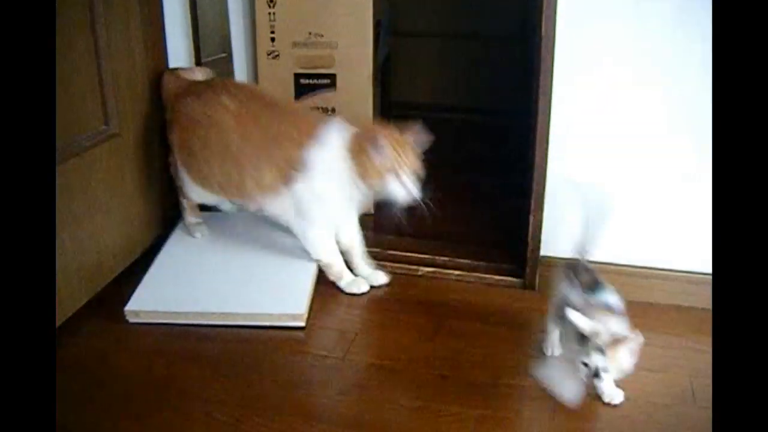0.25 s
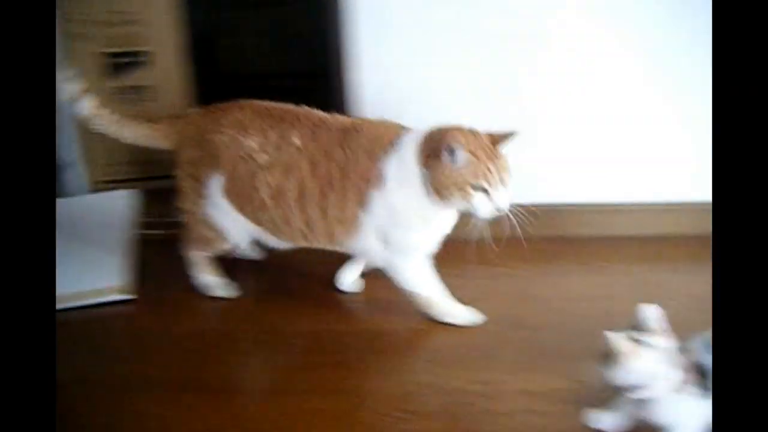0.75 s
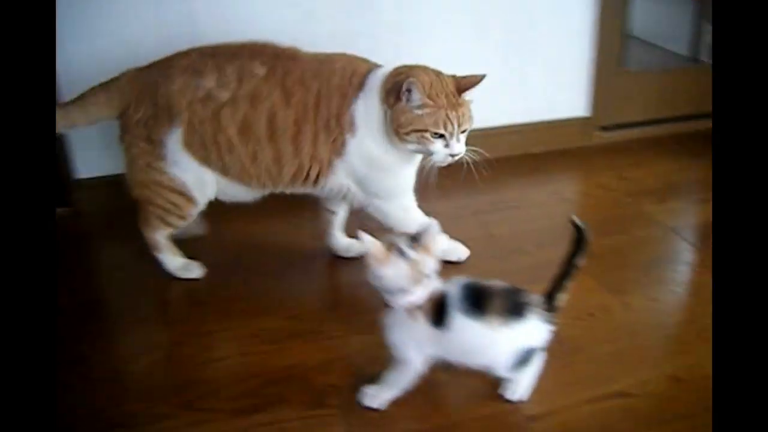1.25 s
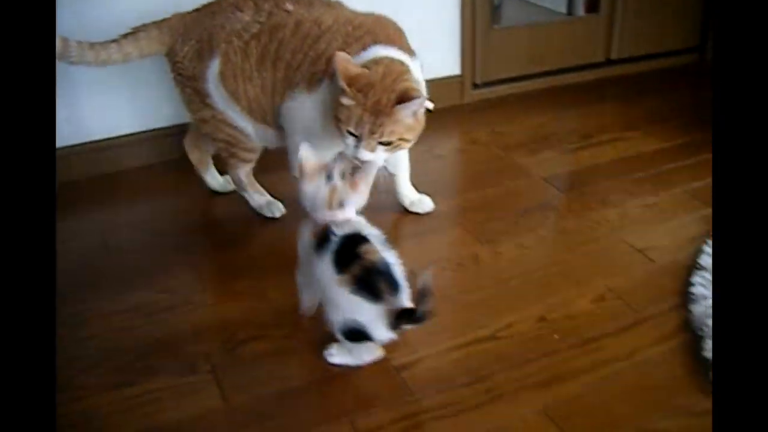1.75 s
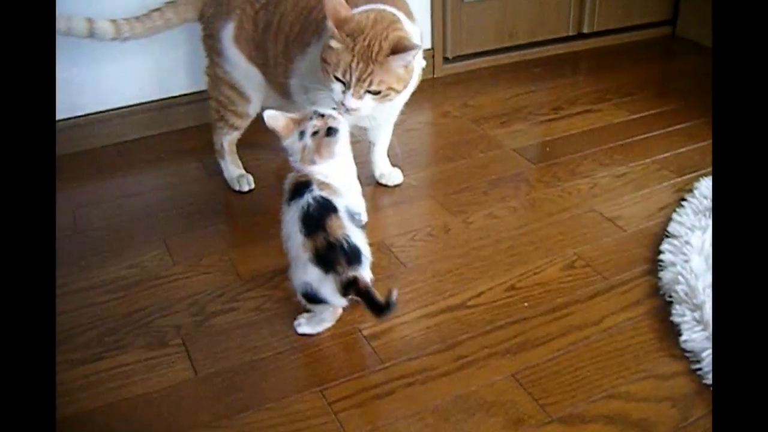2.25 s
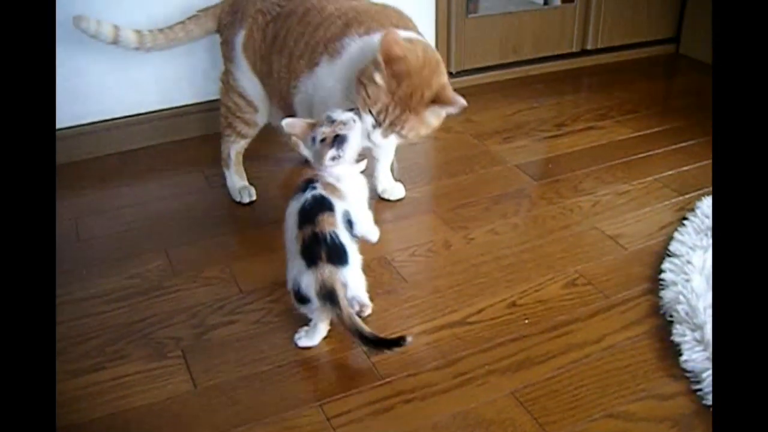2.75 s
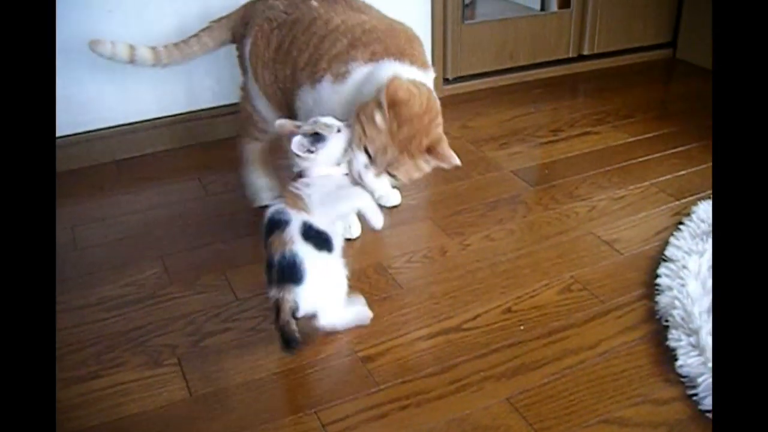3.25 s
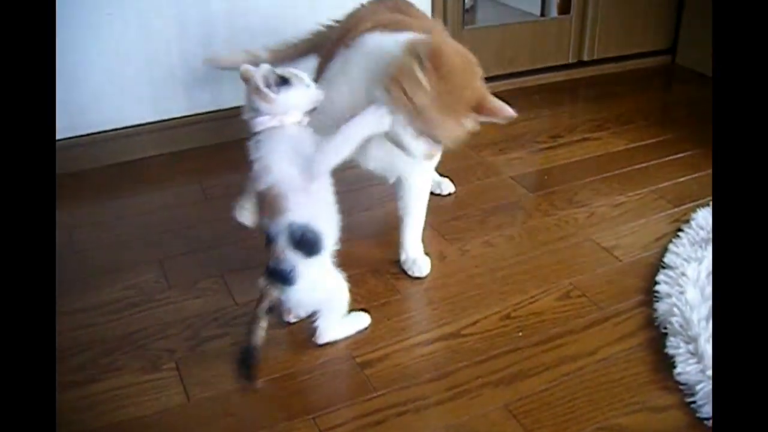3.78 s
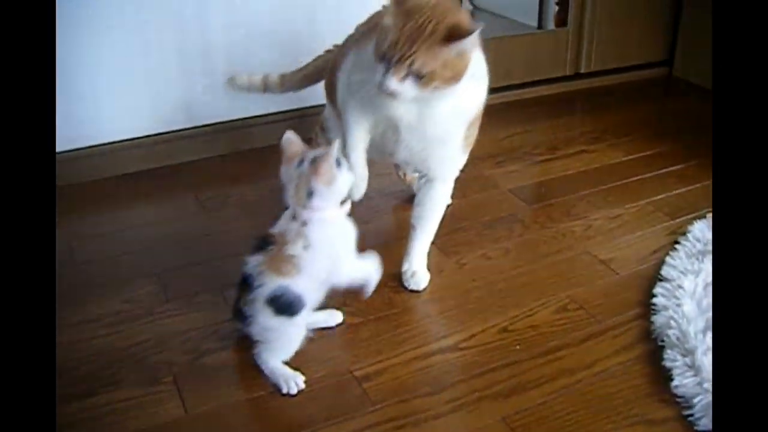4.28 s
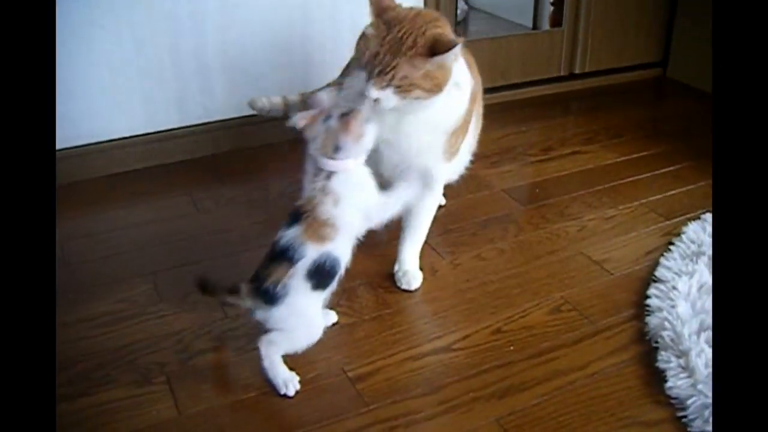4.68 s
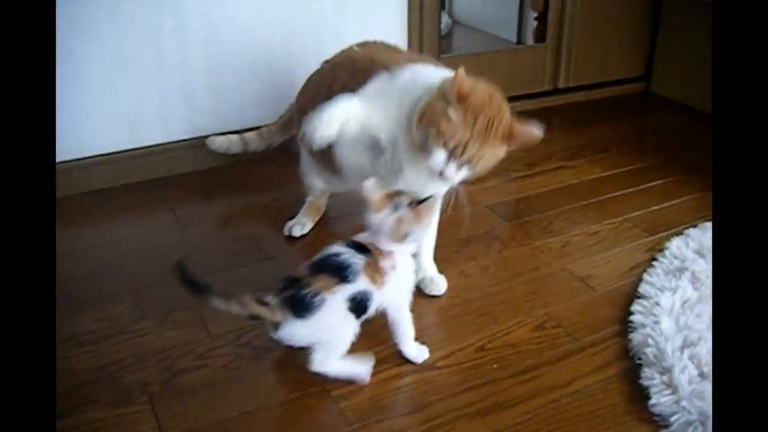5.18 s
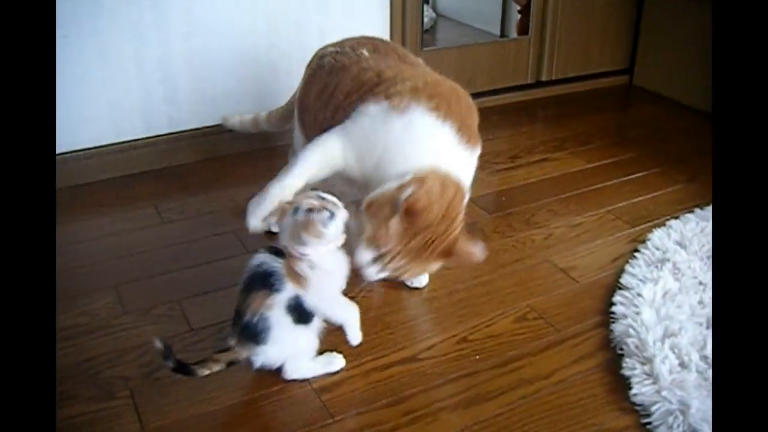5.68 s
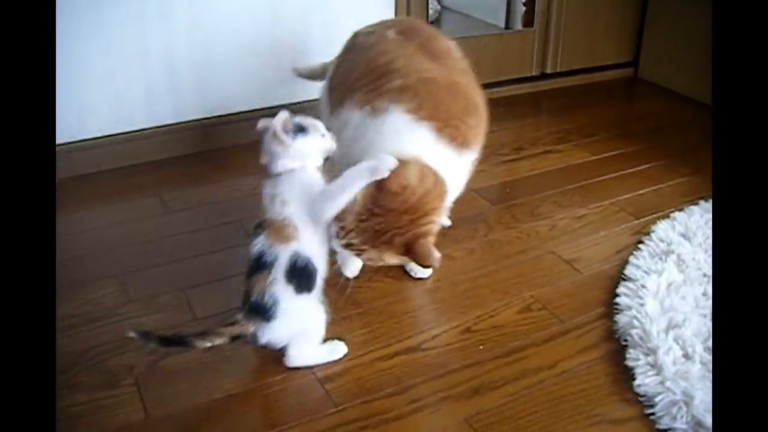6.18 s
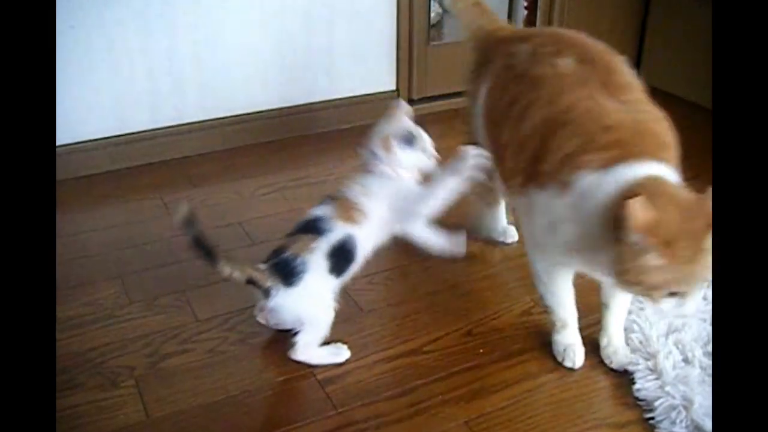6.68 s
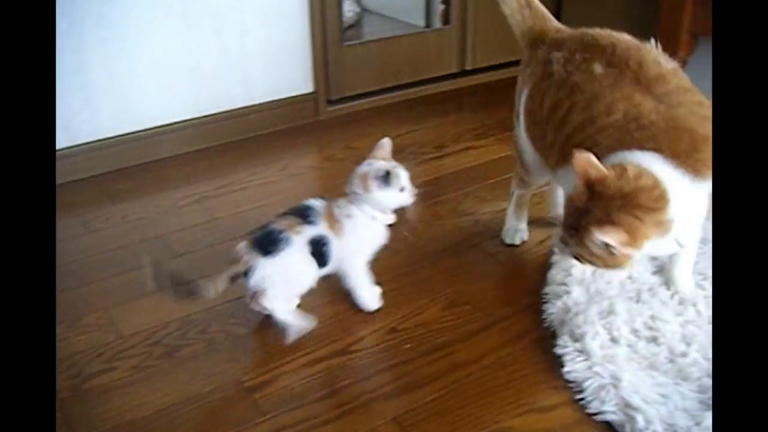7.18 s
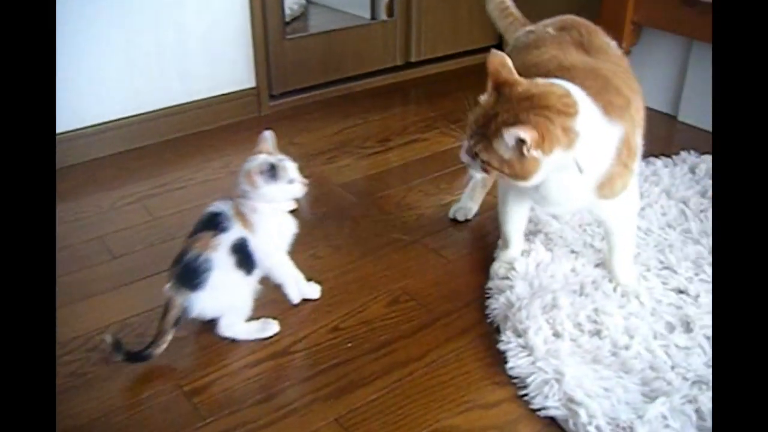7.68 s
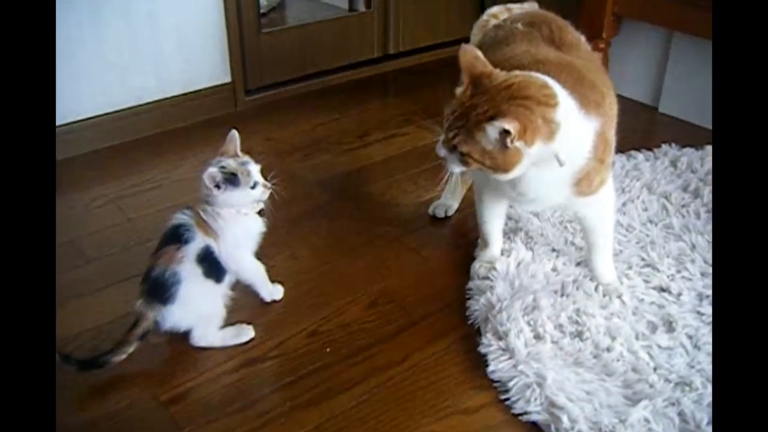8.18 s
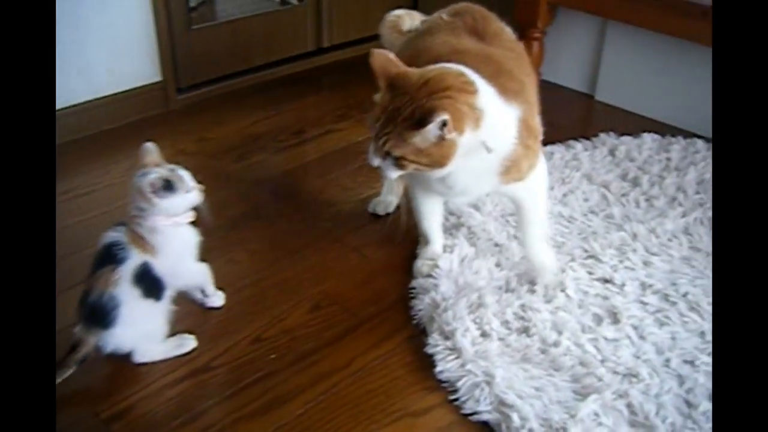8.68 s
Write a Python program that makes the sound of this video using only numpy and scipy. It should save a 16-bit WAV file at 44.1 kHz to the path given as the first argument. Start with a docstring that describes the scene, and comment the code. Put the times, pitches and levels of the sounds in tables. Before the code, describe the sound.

A small quiet room with a hollow wooden floor, steady soft hiss and an almost inaudible, very high whine. From 0 to 0.4 s, light paw thuds, claw ticks and faint bell tinkles, with a swelling scrape. At 0.44 s a loose board bangs very loudly, overloading the microphone, with a short woody boom; it rocks in weakening knocks and low thuds until about 0.75 s. Small claw clicks and bell jingles continue, sharper near 1.0 s, thinning by 1.8 s. Near quiet until 2.9 s, when there is one small tick. From 3.3 s soft thumps and jingles return, with a strong hard knock at 4.03 s. Sparse taps follow from 4.6 to 5.6 s. At 6.4-7.2 s comes a flurry of padded thumps, ticks and a brighter jingle at 6.6 s. After a pause, firm wooden knocks, claw clicks and brief skids cluster from 8.1 to 8.9 s.

```python
"""A small quiet room with a hollow wooden floor, where a kitten and a grown cat scuffle.
Paws, and the floor rocking, thud as excited floor modes; claws tick as noise cracks with woody knocks;
fur, pads and the rocking board scrape as noise, a collar bell jingles as struck resonances, a loose board bangs.
A thin steady high whine, as of a television, is in the room; a small microphone adds hiss and a treble dip,
clips the peaks and cuts the top steeply, which weakens the whine."""
import sys
import numpy as np
from scipy import signal
from scipy.fft import rfft, irfft
from scipy.io import wavfile
from scipy.ndimage import uniform_filter1d

SR = 44100
rng = np.random.default_rng(int(sys.argv[2]) if len(sys.argv) > 2 else 0)


def master_out(mix):
    """Clip the mix to full scale and print it as 16-bit PCM to the path in sys.argv[1]."""
    frames = np.transpose(np.atleast_2d(mix))
    ceiling = np.clip(frames, -1, 1)
    pcm = np.round(ceiling * 32767).astype(np.int16)
    wavfile.write(sys.argv[1], SR, pcm)


N = 394254   # samples

# Landings and the rocking floor
CONTACT_S = 0.003037   # the boards are loaded this long after the touch
LANDING_RISE_S = 0.0024   # time constant
PAD_SOFT_HZ, PAD_FIRM_HZ = 133, 560   # the pad pushes higher modes the firmer it lands
PAD_NARROW_DB = 20   # dB per octave squared, before hard landings spread it
WEIGHT_HZ, WEIGHT_NARROW_DB = 88, 21.5   # the weight pushes the lowest modes; dB per octave squared
HARD_LANDING_DB, SPREAD_PER_DB = -24, 0.2   # above this peak: share of narrowness lost per dB

# Claws, bell and skids
TICK_TREBLE_HZ, TICK_ECHO_T60_S = 9900, 0.28
KNOCK_DB = -26   # re the tick's level
RATTLE_S = 0.076   # the pellet's later hits fall within this time
SWELL_DB = 32   # a skid swells in from this far below its level

# Loose board, hiss, whine in the room, microphone cut
BOOM_DB, BOOM_T60_S = 2, 0.21   # level re the contact's level
HISS_DB = -49
WHINE_HZ, WHINE_DB = 16020, -76   # before the microphone's cut
CUTOFF_HZ = 15850


def from_db(db):
    """Level to amplitude: 20 dB is a factor of ten."""
    return 10 ** (np.asarray(db) / 20)


def rms_one(x):
    """Power normalization: scales a signal to rms 1."""
    return x / np.sqrt(np.mean(x ** 2) + 1e-20)


def coloured(size, level_db):
    """Spectral shaping: white noise weighted by a level function of frequency, at rms 1."""
    hz = np.maximum(np.fft.rfftfreq(size, 1 / SR), 10)
    spectrum = rfft(rng.standard_normal(size)) * from_db(level_db(hz))
    return rms_one(irfft(spectrum, size))


def on_log_axis(points):
    """Log-frequency interpolation: a spectrum table becomes a function of Hz."""
    hz, level = np.transpose(points)
    return lambda f: np.interp(np.log(f), np.log(hz), level)


def hump(centre_hz, db_per_octave2):
    """Broad resonance: level falls with the square of the distance in octaves."""
    return lambda f: -db_per_octave2 * np.log2(f / centre_hz) ** 2


def dying(t, t60, rise):
    """Exponential decay: a blow's envelope rises quickly, then loses 60 dB in t60."""
    onset = 1 - np.exp(-t / max(rise, 1e-4))
    return onset * from_db(-60 * t / max(t60, .005))


def wobble(shape, depth_db, size):
    """Random amplitude modulation: an uneven gain, smoothed over a number of samples."""
    smooth = uniform_filter1d(rng.standard_normal(shape), size=size)
    return from_db(depth_db * rms_one(smooth))


def ring(clicks, hz, t60):
    """Damped resonance: a unit click sets a sine of height 1 ringing."""
    r, w = from_db(-60 / (t60 * SR)), 2 * np.pi * hz / SR
    return signal.lfilter([0, np.sin(w)], [1, -2 * r * np.cos(w), r * r], clicks)


def add(out, s, sound):
    """Superposition: mixes a sound in at a time."""
    at = round(s * SR)
    out[at:at + len(sound)] += sound[:N - at]


def room_hiss():
    """Stationary noise: room tone and microphone hiss share one fixed spectrum."""
    # room tone and microphone hiss: f/Hz, relative level per Hz/dB
    hiss_spectrum = [(20, -15), (55, -3), (100, -6), (300, -12), (1000, -16.5), (3000, -23), (6000, -24.5),
                     (9000, -24.5), (12000, -29), (16000, -30.5)]
    return from_db(HISS_DB) * coloured(N, on_log_axis(hiss_spectrum))


def whine():
    """Pure tone: a steady sine in the room, as of a television; its rms is its height over the root of two."""
    t = np.arange(N) / SR
    return from_db(WHINE_DB) * np.sqrt(2) * np.sin(2 * np.pi * WHINE_HZ * t)


def thuds():
    """Modal excitation: weight pushes low floor modes, the pad higher ones; a dull boom and a slap die with them."""
    # paws and bodies landing, and the floor rocking after the bang: touch t/s, body peak level/dB,
    # firmness (0-1), weight level re pad/dB, slap level re 5 dB below body peak/dB, decay time scale/s
    landings = [(0.022, -34, 0.55, -26, -5.5, 0.25), (.099, -32, 0.89, -17, -12, 1),
                (.139, -23, 0.46, 10, -43, 0.29), (.197, -32, 0.1, -11, -15, 0.13),
                (.304, -28, 0.3, 5, -9.5, 0.75), (.32, -26, 0.87, -2.5, -13, 0.96),
                (.369, -33, .9, -13, -14, .4), (.499, -15, 1, -10, -5.5, 0.55),
                (.549, -14.5, 0.43, -7, -1.5, 0.63), (.599, -17, 0.53, -8, -8, 0.44),
                (.745, -17.5, 0.4, -5.5, -8.5, 0.24), (1.084, -29, 0.48, -2, -11, 0.41),
                (1.342, -42.5, .55, 1, -8, 0.36), (1.472, -28.5, 0.11, -8, -34, .25),
                (1.594, -28, 0.46, -5.5, -34, 0.21), (1.733, -37, .45, -22, -32, 0.32),
                (3.346, -30.5, .85, -5, -10, 0.19), (3.397, -36, 0.18, -7, -15, 0.51),
                (3.591, -30, 0.22, 2.5, -21, .43), (3.796, -27.5, 0.31, -4.5, -20, 0.31),
                (4.029, -21, .0, -38, -20, 0.35), (4.028, -21, 0.68, -40, -4, 0.34),
                (4.636, -41, 0.04, -9, -2.5, .16), (4.726, -39.5, 0.3, -10, -14, .15),
                (4.949, -29, 0.55, -9.5, -2.5, 0.31), (5.2, -40.5, 0.28, 7, -10, 0.37),
                (5.361, -31, 0.51, -2, -24, 0.39), (6.359, -41, 0.05, -12, -18, 0.68),
                (6.424, -23.5, 0.3, -8, -16, 0.37), (6.426, -29.5, 1, -21, -7, 0.32),
                (6.52, -25, 0.37, -6, -18, 0.29), (6.627, -25.5, .4, -2.5, -23, 0.3),
                (6.641, -22, 0.52, -12, -19, 0.34), (6.861, -27, 0.51, -10, -15.5, 0.45),
                (6.918, -27.5, 0.62, -14, -12, 0.29), (6.969, -29.5, 0.8, 6, -18, 0.13),
                (7.108, -40.5, 0.64, -5, -5, 0.54), (7.189, -26, 0.49, -9.5, -21, .37),
                (8.113, -17.5, 0.78, -41, -21, 0.31), (8.195, -17.5, .9, -40, -9.5, 0.33),
                (8.347, -34.5, 0.8, 0, -10, 0.37), (8.392, -15, 0.86, -40, -23, 0.31),
                (8.469, -28.5, 0.4, -26, -13, 0.96), (8.518, -19.5, 0.74, -40, -22, 0.43),
                (8.592, -22.5, 0.28, -6, -12, 0.28), (8.624, -25.5, 0.29, -9, -12, 0.51),
                (8.659, -27.5, 0.86, -30, -4.5, 0.37), (8.777, -32.5, 0.81, -23, -8.5, 0.32),
                (8.849, -34.5, 0.8, -13, -12, 0.87), (8.907, -29.5, 0.31, -17, -16, 0.72)]
    # modes of the floor boards: f/Hz, level/dB, share of the landing's decay time scale
    floor_modes = [(33.7, 2.5, 1.9), (58.34, -1.5, 3.7), (84.7, 4, 0.77), (110.3, 2, 0.41), (133, -9, 2.5),
                   (172, 5, 0.6), (188.7, -1.5, 1.1), (230, -5, 0.54), (278.5, 1.5, 0.61),
                   (297.6, -2.5, 1.25), (334.7, 0, 0.7), (356.7, -7.5, 0.56), (405.8, -4.5, 0.45),
                   (487.6, -2.5, 0.45), (566.3, -6.5, 0.63), (674, -11.5, 0.55), (885, -17.5, 1.1)]
    out, t = np.zeros(N), np.arange(24000) / SR
    hz, mode_db, share = np.transpose(floor_modes)[:, :, None]
    weight_hump = hump(WEIGHT_HZ, WEIGHT_NARROW_DB)
    for s, peak_db, firm, weight_db, slap_db, t60 in landings:
        chance = rng.standard_normal((2, len(hz), 1))
        kept = np.clip(1 - SPREAD_PER_DB * (peak_db - HARD_LANDING_DB), .2, 1)
        pad = hump(PAD_SOFT_HZ * (PAD_FIRM_HZ / PAD_SOFT_HZ) ** firm, PAD_NARROW_DB * kept)

        def push(f):
            """Sum of forces: pad and weight add in amplitude."""
            return 20 * np.log10(from_db(pad(f)) + from_db(weight_db + weight_hump(f)) + 1e-9)

        strength = from_db(mode_db + push(hz) + 2 * chance[0])
        tones = np.sin(2 * np.pi * hz * t + .5 * chance[1])
        modes = strength * tones * from_db(-60 * t / (share * t60))
        body = modes.sum(axis=0) * dying(t, 2.6, LANDING_RISE_S)
        body = signal.lfilter(*signal.butter(2, 28, "high", fs=SR), body)   # the boards radiate no steady push
        body = body / np.abs(body).max()

        dull_hump = hump(250, db_per_octave2=3.0)
        dull = coloured(len(t), lambda f: push(f) + dull_hump(f))
        boom = from_db(-17.5) * dull * dying(t, 1.84 * t60, LANDING_RISE_S + 0.0014)
        slap_noise = coloured(len(t), hump(790, db_per_octave2=10.0))
        slap = from_db(slap_db - 5) * slap_noise * dying(t, 0.86 * t60, 0.00025)
        add(out, s + CONTACT_S, from_db(peak_db) * (body + boom + slap))
    return out


def ticks():
    """Impact and reverberation: a crack of a few ms, a woody knock, then the gritty echo in the room."""
    # claws and hard pads on the varnish: t/s, overall level/dB, centre f/Hz,
    # narrowness/(dB per octave squared; sign ignored), treble level re the middle band/dB, echo level re overall/dB
    claws = [(.1052, -32.5, 4370, 2.5, -8, -14.5), (.1797, -36, 2040, 0, -13, -15),
             (0.23, -48, 2560, 14, 13.5, -9.5), (0.276, -39, 2550, -10, 1, -30),
             (.3025, -33, 2230, 10, -6, -5.5), (.4366, 0, 3180, 5, -32, -26),
             (.7425, -29, 2260, 25, -29, -20), (.7748, -38.5, 2770, 1, 3, -24),
             (0.8236, -36, 2620, 11, -16, -16), (0.8534, -38.5, 2270, 2, 4, -18),
             (0.882, -29.5, 2304, 4, -12, -19), (0.8992, -32, 2770, 8, -3, -25),
             (.93, -47.5, 2250, 8, 18.5, -22), (1.0097, -21.5, 3800, 10.5, -22, -22),
             (1.0223, -17, 3770, 15, -15, -25.5), (1.096, -27.5, 2650, 10, -33, -21),
             (1.2737, -33.5, 2400, 5, -20, -31), (1.299, -29, 3220, 47, -27, -16.5),
             (1.4394, -56.5, 3200, 8, 21, -12), (1.5376, -24, 3970, 17, -12, -24),
             (1.7439, -36, 3110, 31, -20, -26), (1.769, -40, 3400, 12, 5, -35),
             (2.9322, -34, 4270, 16.5, -4, -15), (3.347, -34.5, 2090, 4, -14.5, -21),
             (3.686, -19.5, 2500, 6, -30, -19), (3.9204, -33, 2270, 1, 0, -16.5),
             (3.9374, -42.5, 2160, 2, 17.5, -19.5), (4.0312, -8.5, 2400, 20.5, -22, -17.5),
             (4.16, -43.5, 2920, 19, 3, -10.5), (4.6356, -31, 2650, 2.5, -13, -18.5),
             (4.9503, -25.5, 2200, 30, -32, -26), (5.1507, -31, 2400, 40, -26, -24),
             (5.2386, -53, 2880, 5, 13, -12.5), (5.555, -41.5, 2460, 11, -16, -11.5),
             (6.443, -24, 3220, 9, -28, -14.5), (6.4998, -40, 3090, 8, -14, -19),
             (6.6288, -31, 2520, 1.5, -10, -12.5), (6.6619, -28.5, 2700, 1, -15, -16),
             (6.691, -41, 2020, 13, 4, -10), (6.7361, -31, 2220, 5, -17, -14.5),
             (6.754, -29, 3070, 0, -24, -39), (6.8, -44.5, 3800, 0, -8, 1.5),
             (6.9207, -34.5, 2900, 2, -2, -13), (6.979, -44.5, 2190, 9, 17.5, -17.5),
             (6.998, -32.5, 3420, 2, -4, -22), (7.1096, -30, 2570, 1.5, -13, -14.5),
             (8.1173, -21.5, 2140, 18.5, -18, -31), (8.1223, -23.5, 2340, 4, -17, -15),
             (8.1984, -18.5, 2130, 17, -10, -31), (8.2015, -21.5, 2520, 1, -15, -17),
             (8.3985, -20, 2500, 10, -16, -18), (8.4724, -31.5, 2900, 3.5, -23, -10.5),
             (8.5277, -24.5, 2670, 20, -17, -16.5), (8.558, -33, 2740, 2, -20, -9),
             (8.6661, -28.5, 2720, 17, -18, -14.5), (8.7793, -41.5, 2800, 1.5, -14, -3.5),
             (8.9122, -30.5, 2660, 16, -9, -15)]
    # modes of the varnished boards knocked hard: f/Hz, level/dB, t60/s
    knock_modes = [(682, -6, 0.2), (1095, -9, 0.197), (1357, -6.5, 0.12), (1714, -17.5, .25),
                   (2100, -18.5, 0.15), (2400, -10, 0.27), (2520, -3, 0.098), (2650, -18, 0.6),
                   (2620, -18, 0.358), (2817, -15.5, 0.52), (3006, -14.5, .28), (3180, -23.5, 0.28),
                   (3500, -24, .25), (3950, -21, 0.4)]
    out, t = np.zeros(N), np.arange(16000) / SR
    hz, mode_db, t60s = np.transpose(knock_modes)[:, :, None]
    modes = from_db(mode_db - 60 * t / t60s) * np.sin(2 * np.pi * hz * t)

    def peaks(f):
        """Resonance curves: each mode raises the level of the noise around it."""
        curves = 3.5 * from_db(mode_db) / (1 + ((f - hz) / 45.0) ** 2)
        return 10 * np.log10(1 + curves.sum(axis=0))

    crack = from_db(-4.5) * dying(t, .012, 0.00038)
    for s, level_db, centre_hz, narrow, treble_db, echo_db in claws:
        tail = from_db(echo_db) * wobble(len(t), depth_db=2.0, size=130)
        broad = hump(centre_hz, abs(narrow))
        woody = coloured(len(t), lambda f: broad(f) + peaks(f))   # the echo keeps the colour of the boards
        mid = coloured(len(t), broad) * crack + woody * tail * dying(t, TICK_ECHO_T60_S, 0.011)

        top_envelope = crack + tail * dying(t, 1.1 * TICK_ECHO_T60_S, .004)
        top = coloured(len(t), hump(TICK_TREBLE_HZ, db_per_octave2=37.0)) * top_envelope
        beating = wobble(modes.shape, depth_db=3.5, size=500)   # close neighbours of each mode beat against it
        knock = from_db(KNOCK_DB) * rng.choice([-1, 1], len(hz)) @ (modes * beating)
        add(out, s, from_db(level_db) * (mid + knock + from_db(treble_db) * top))
    return out


def bell():
    """Repeated impact: each shake throws the pellet at the shell, and it rolls on in weaker, uneven hits."""
    # shakes of the collar bell: t/s, relative level/dB
    shakes = [(0.145, -36.5), (.236, -37.5), (.35, -41), (0.633, -36.5), (0.7997, -42), (.9705, -32),
              (1.166, -35), (3.412, -50), (3.489, -39), (3.54, -42), (3.644, -34), (3.7334, -43),
              (3.795, -31), (3.825, -32), (3.925, -24), (3.9794, -42), (4.0682, -43), (4.956, -41),
              (4.9843, -41.5), (5.057, -37.5), (5.159, -43.5), (5.306, -49), (5.495, -48), (6.415, -43),
              (6.481, -36), (6.531, -34.5), (6.618, -21), (6.6902, -27.5), (6.753, -32), (6.836, -32),
              (7.119, -46), (7.1493, -37), (7.1994, -44)]
    # modes of the collar bell: f/Hz, relative level/dB, t60/s
    bell_modes = [(8730, -3, .06), (8800, 0, .08), (9254, -18, .04), (7975, -9, .16)]
    out, count, touch_t60 = np.zeros(N), 12, .008
    s, shake_db = np.transpose(shakes)[:, :, None]
    late = np.sort(rng.random((len(s), count)), axis=1) * (np.arange(count) > 0)   # the first hit is at once
    at = np.minimum(((s + late * RATTLE_S) * SR).astype(int), N - 1)
    for hz, mode_db, t60 in bell_modes:
        clicks = np.full(N, 1e-18)
        hit_db = shake_db + mode_db - 5.5 - 16.0 * late + 2.1 * (late == 0)
        size = from_db(hit_db) * rng.normal(0, 0.94, at.shape)
        np.add.at(clicks, at.ravel(), size.ravel())
        # a rolling touch swells the mode in
        rolling = ring(clicks, hz, touch_t60) * 2 * np.log(1000) / (touch_t60 * SR)
        out += ring(rolling, hz, t60)
    return out


def skids_and_scrape():
    """Sliding friction: grainy noise in a broad middle band and a treble band swells, holds and dies."""
    # fur and pads skidding, and the loose board scraping as it rocks:
    # full level at t/s, swell/s, hold/s, t60/s, middle level/dB, treble level re middle/dB
    slides = [(0.35, 0.088, .08, .2, -44.5, 7), (0.425, 0.18, .004, .04, -27.5, -17),
              (0.447, 0.04, .15, 0.52, -37, -31), (1.033, 0.0053, 0.0076, 0.63, -53, -6),
              (3.686, .006, 0.0022, 0.35, -36.5, -27), (6.373, .045, 0.092, .3, -47, -5),
              (8.199, .012, .003, 0.58, -40.5, -10), (8.595, .012, 0.066, .1, -47, -12),
              (8.671, .02, .003, 0.46, -41, -13)]
    t, mid_gain, top_gain = np.arange(N) / SR, np.zeros(N), np.zeros(N)
    for s, swell, hold, t60, level_db, treble_db in slides:
        rising_db = SWELL_DB * np.minimum((t - s) / swell, 0)
        falling_db = -60 * np.maximum(t - s - hold, 0) / t60
        gain = (t > s - swell) * from_db(level_db + rising_db + falling_db)
        mid_gain += gain
        top_gain += gain * from_db(treble_db)
    grain = wobble(N, depth_db=0.5, size=90)
    mid = coloured(N, hump(1700, db_per_octave2=2.0))
    top = coloured(N, hump(9100, db_per_octave2=61.5))
    return grain * (mid_gain * mid + top_gain * top)


def bang():
    """Modal ringing: each contact rings the board's modes, stirred unevenly, over a dense boom of the room."""
    # the loose board bangs, then rocks: t/s, level/dB
    contacts = [(0.437, -4), (0.49, -16.5), (0.545, -21), (0.59, -22), (0.635, -25.5)]
    # modes of the loose board: f/Hz, level/dB, t60/s
    board_modes = [(57.8, -15, 0.28), (191, -16, 0.72), (237, -11.5, 0.29), (288, -12.5, 0.67),
                   (445.7, 3, 0.12), (497.7, -12, 0.4), (598.4, -16, .4), (669, -3.5, 0.48), (789, -14, .5),
                   (827, -19.5, 0.77), (880, -10, 0.6), (940, -17, 0.4), (922, -15, 0.54),
                   (1047, -19, 0.55), (1140, -24, .5), (1320, -18.5, 0.12), (1420, -27.5, .5)]
    # spectrum of its dense boom: f/Hz, relative level per Hz/dB
    boom_spectrum = [(30, -40.5), (150, 2.5), (300, 8.5), (700, -5), (1000, -0.5), (1400, -3),
                     (1800, -20.5), (4000, -66.5)]
    out, t = np.zeros(N), np.arange(SR) / SR
    hz, mode_db, t60 = np.transpose(board_modes)[:, :, None]
    modes = from_db(mode_db - 60 * t / t60) * np.sin(2 * np.pi * hz * t)
    broad = on_log_axis(boom_spectrum)

    def peaks(f):
        """Resonance curves: each mode raises the level of the boom around it."""
        return 10 * np.log10(1 + (7.4 / (1 + ((f - hz) / 12.0) ** 2)).sum(axis=0))

    for s, level_db in contacts:
        boom_noise = coloured(len(t), lambda f: broad(f) + peaks(f))
        boom = from_db(BOOM_DB) * boom_noise * dying(t, BOOM_T60_S, 0.00092)
        # the first contact starts all modes in one direction, later ones at random
        sign = 1 if s == contacts[0][0] else rng.choice([-1, 1], len(hz))
        strength = from_db(rng.normal(0, 1.1, len(hz))) * sign
        ringing = strength @ (modes * wobble(modes.shape, depth_db=4.0, size=700))
        add(out, s, from_db(level_db) * (ringing + boom))
    return out


def scene():
    """Superposition: the sounds of cats and boards add to the hiss and the whine."""
    return (room_hiss() + whine() + thuds() + ticks() + bell() + skids_and_scrape() + bang())[None]


def record(dry):
    """Linear filtering and overload: the microphone dips near 8 kHz, peaks clip, the top is cut."""
    # microphone dips: centre f/Hz, width/Hz, depth (0-1)
    treble_dips = [(7750, 3600, .7), (7830, 1300, .86)]
    for hz, width_hz, depth in treble_dips:
        b, a = signal.iirpeak(hz, hz / width_hz, fs=SR)
        dry = dry - np.clip(depth, 0, 1) * signal.lfilter(b, a, dry)
    cut = signal.ellip(12, .5, 80, CUTOFF_HZ, fs=SR, output="sos")   # ripple 0.5 dB, stop band 80 dB down
    overloaded = np.clip(dry, -.98, .98)
    return np.clip(signal.sosfilt(cut, overloaded), -1, 1)


dry = scene()
out = record(dry)
master_out(out)
```